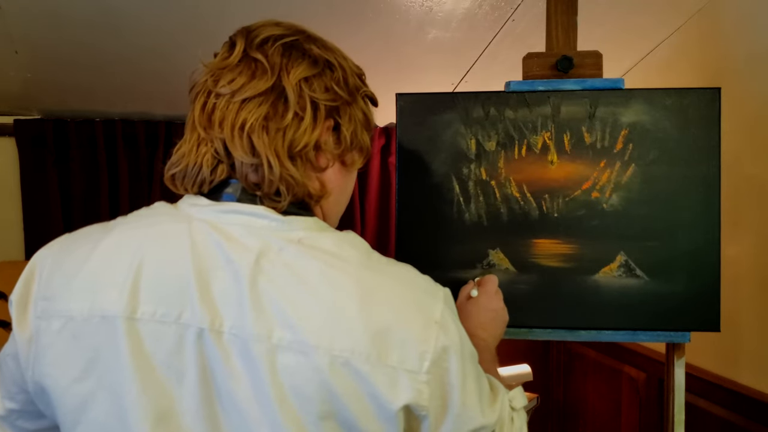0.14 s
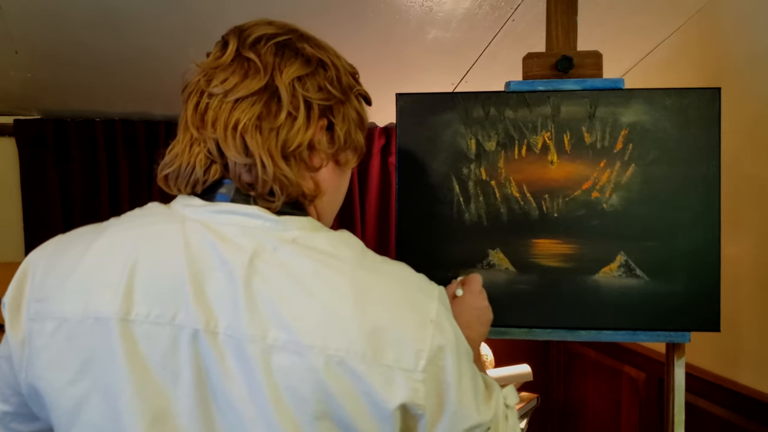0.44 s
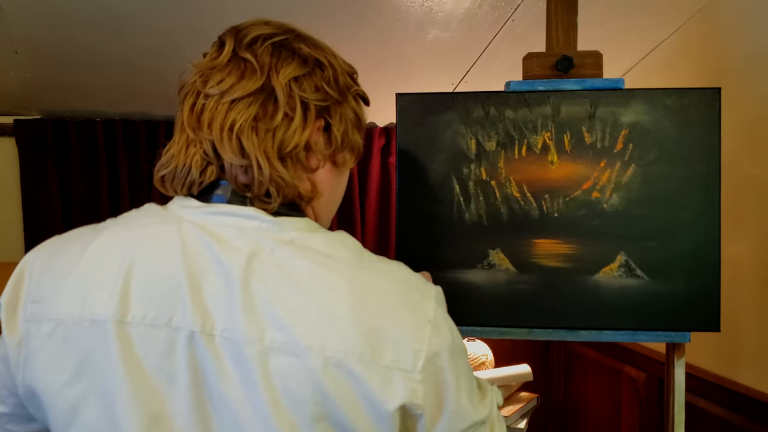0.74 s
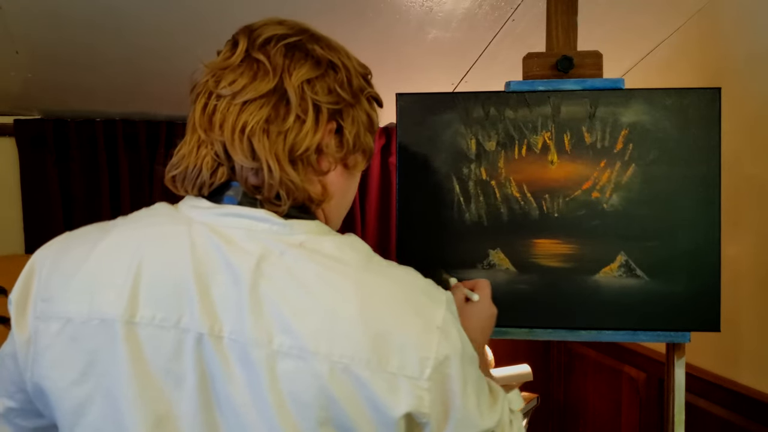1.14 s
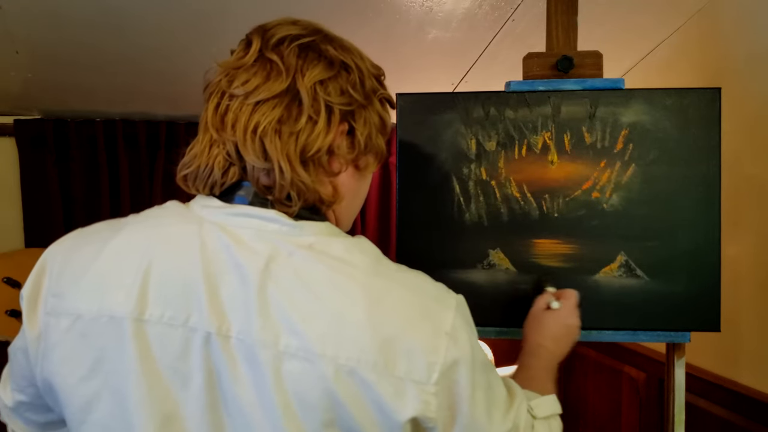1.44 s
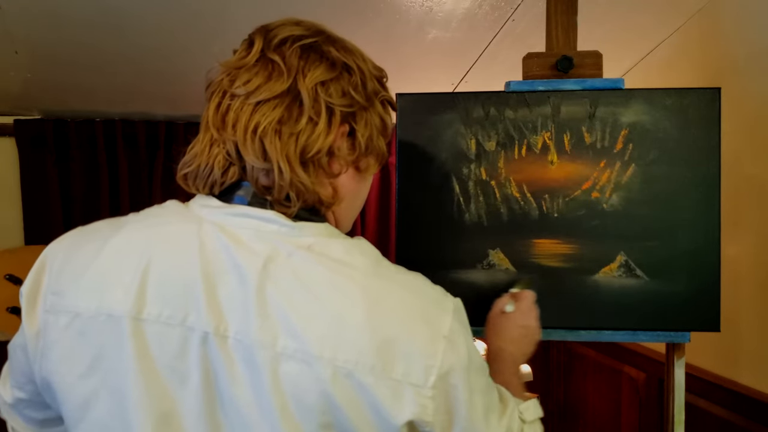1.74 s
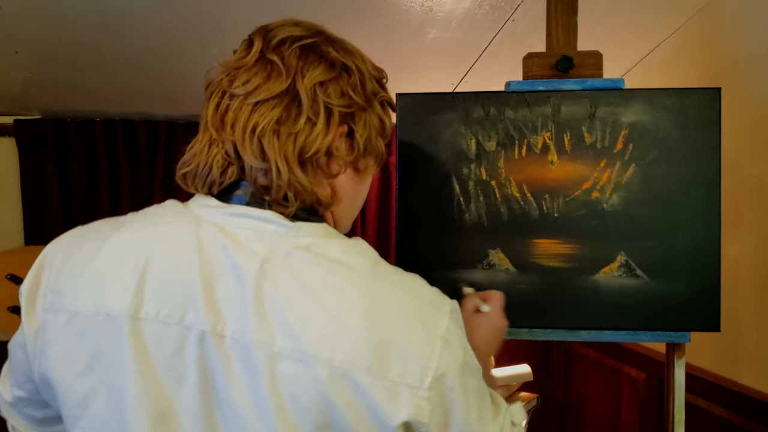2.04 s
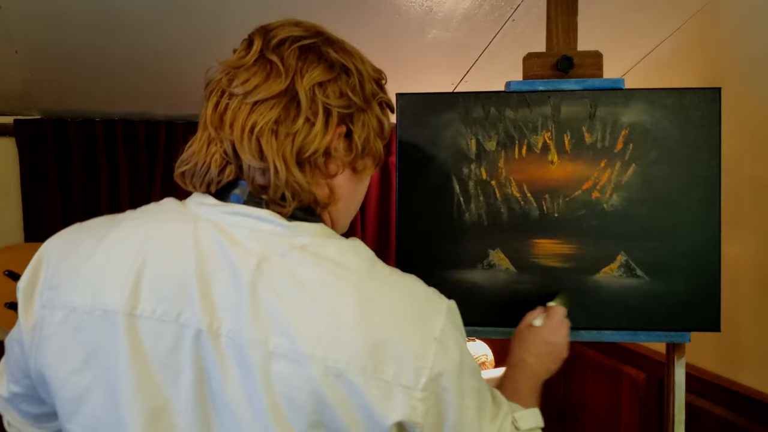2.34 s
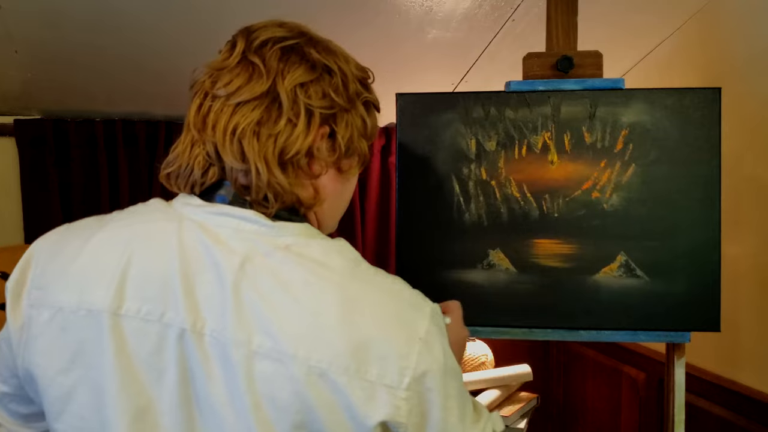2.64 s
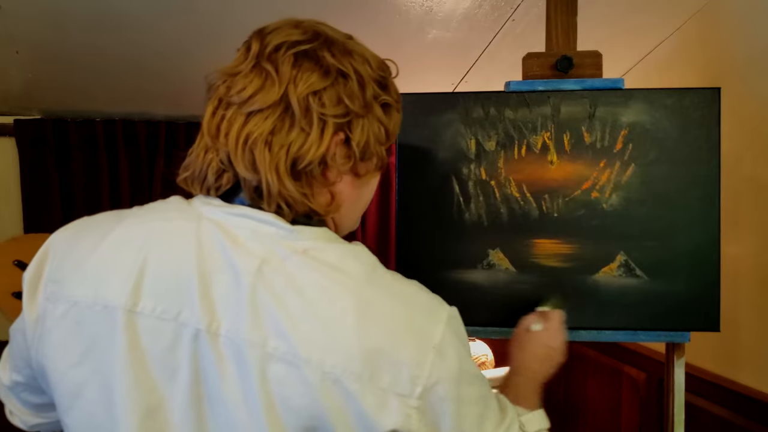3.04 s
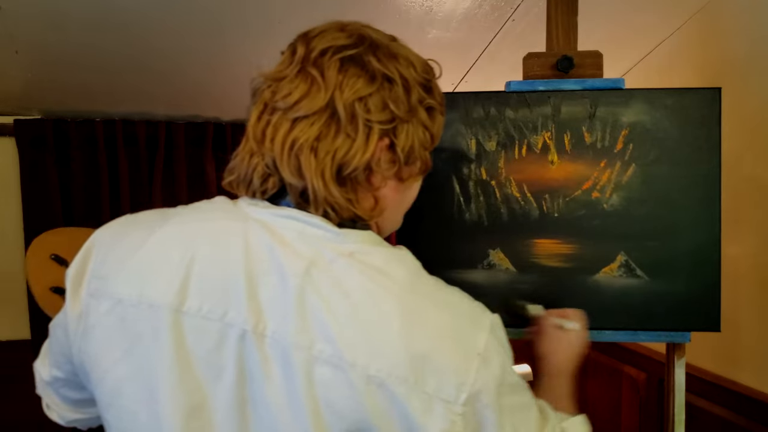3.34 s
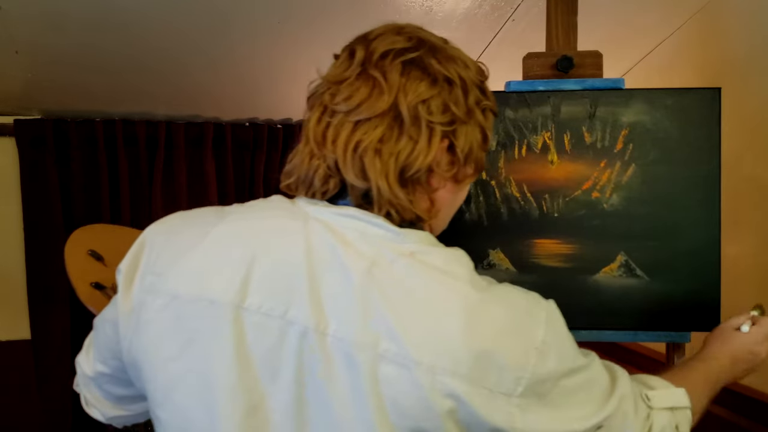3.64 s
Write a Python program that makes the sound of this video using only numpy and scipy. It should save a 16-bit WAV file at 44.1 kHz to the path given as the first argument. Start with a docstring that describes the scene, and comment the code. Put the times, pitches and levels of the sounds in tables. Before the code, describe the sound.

Bristle brush rubbing on stretched canvas, slow at first, then brisk scratchy strokes to and fro

```python
"""A bristle brush scrubs paint over a stretched canvas in a quiet, dry room, above a faint arm rustle.
First comes one long rub: stick-slip noise gives the hiss, threads crossed at hand speed a gliding zip, and
low-pitched noise the soft drumming of the canvas. The bristles flip over with a short rasp as it ends.
After a pause follow seven quick strokes to and fro, each closing with a rasp, three opening with a landing.
At last the brush knocks on the canvas, a damped sine; a short decaying noise tail forms the room."""
import sys
import numpy as np
from scipy import signal
from scipy.fft import rfft, irfft
from scipy.io import wavfile

SR = 44100
rng = np.random.default_rng(int(sys.argv[2]) if len(sys.argv) > 2 else 0)


def dump_mix(stems):
    """Bounce the given channels to the path in sys.argv[1] as a 16-bit WAV at rate SR."""
    frames = np.atleast_2d(stems).T  # one column per channel
    limited = np.clip(frames, -1, 1)  # hard clip at full scale
    pcm = np.round(limited * 32767).astype(np.int16)
    wavfile.write(sys.argv[1], SR, pcm)


N = 167580
T = np.arange(N) / SR  # s

# spectrum of bristles scratching over the weave: f/Hz, spectral level/dB
SCRATCH_SPECTRUM = [(100, -31), (400, -18.5), (560, -5.5), (700, -5), (850, -12.5), (1100, -2), (1350, 2.5),
                    (1700, 2), (1900, 0.5), (2150, -18.5), (5000, -28.5), (15000, -50.5)]


def amp(db):
    """Level is logarithmic: 20 dB are a factor of ten in amplitude."""
    return 10 ** (np.asarray(db) / 20)


def unit(x):
    """Normalisation by the root mean square makes a level set the power."""
    return x / np.sqrt(np.mean(x ** 2) + 1e-20)


def colour(x, points, tilt_db=0):
    """Linear filtering multiplies a spectrum by a source curve, a tilt in dB per octave and resonances."""
    # fixed resonances of canvas and frame: f/Hz, width/Hz, lift/dB
    resonances = [(416, 35, 3), (670, 55, 3), (880, 70, 3), (1186, 40, 4), (1455, 60, 3), (1570, 60, 3),
                  (1700, 40, 4), (2650, 70, 3), (2890, 60, 2), (3116, 65, 3), (3346, 50, 4), (3530, 40, 3),
                  (4306, 60, 3), (4640, 60, 4), (4820, 50, 3), (5436, 80, 3), (7090, 90, 3)]
    hz = np.arange(1, SR / 2, 5)
    point_hz, point_db = np.transpose(points)
    db = np.interp(np.log(hz), np.log(point_hz), point_db)
    db = db + tilt_db * np.log2(np.maximum(hz, 1000) / 3000)  # no further tilt below 1 kHz
    for centre, width, lift_db in resonances:
        db = db + lift_db / (1 + (2 * (hz - centre) / width) ** 2)
    gain = np.interp(np.fft.rfftfreq(N, 1 / SR), hz, amp(db))
    return unit(irfft(rfft(x) * gain, N))


def fuzzy_tone(hz, pole_width_hz):
    """Modulation shifts low-passed complex noise to a fixed or moving pitch: a narrow noise band."""
    r = np.exp(-np.pi * pole_width_hz / SR)
    noise = rng.standard_normal(N) + 1j * rng.standard_normal(N)
    envelope = signal.lfilter([(1 - r) ** 2], [1, -2 * r, r * r], noise)  # two equal poles
    phase = 2 * np.pi * np.cumsum(hz * np.ones(N)) / SR
    return unit((envelope * np.exp(1j * phase)).real)


def bell(time, half):
    """A Gaussian envelope rises and falls smoothly, to exp(-1/2) at the half length."""
    return np.exp(-.5 * ((T - time) / half) ** 2)


def background():
    """Broadband noise: the rustle of the moving arm over a very low, steady room floor."""
    # loudness of the arm: t/s, level/dB
    arm_levels = [(0, -82), (.72, -80), (.8, -97.5), (.96, -99), (1.11, -116), (1.2, -79), (1.5, -77),
                  (1.62, -66.5), (1.69, -85), (1.76, -66), (2.03, -74.5), (2.22, -75), (2.37, -72),
                  (2.72, -66), (3.05, -63), (3.36, -70.5), (3.8, -65.5)]
    # spectrum of the arm rustle: f/Hz, spectral level/dB
    rustle_spectrum = [(20, -20.5), (60, -4.5), (130, -7), (270, -2.5), (380, -7), (1100, -11.5),
                       (2000, -19.5), (4500, -24.5), (15000, -27)]
    # spectrum of the room floor: f/Hz, spectral level/dB
    floor_spectrum = [(20, -3.5), (70, 5), (250, 10.5), (500, -19.5), (1200, -23), (5000, -29),
                      (15000, -29)]
    floor_db = -102
    arm_gain = amp(np.interp(T, *np.transpose(arm_levels)))
    arm = arm_gain * colour(rng.standard_normal(N), rustle_spectrum)
    return arm + amp(floor_db) * colour(rng.standard_normal(N), floor_spectrum)


def bristles():
    """Stick-slip friction: countless tiny slips sum to Gaussian noise, some sharper catches stand out."""
    catches_per_s, catch_spread_db = 7000, 2.5
    catch_share = 0.29  # of the power
    caught = rng.random(N) < catches_per_s / SR
    strength = amp(catch_spread_db * np.minimum(rng.exponential(1, N), 4))
    catches = unit(rng.standard_normal(N) * strength * caught)
    return np.sqrt(catch_share) * catches + np.sqrt(1 - catch_share) * rng.standard_normal(N)


def weave_zip(start, end, top_time, top_hz, slow, zip_db, half_db):
    """Periodic excitation: the thread-crossing rate follows hand speed and sets the pitch and its octaves."""
    zip_width_hz, half_zip_width_hz = 84, 120  # of each filter pole
    double_zip_db = -6.5  # relative to the zip
    fade_s, lead_s = 0.094, 0.028
    hz = top_hz * .5 ** (((T - top_time) / slow) ** 2)
    upper = amp(double_zip_db) * fuzzy_tone(2 * hz, 2 * zip_width_hz)
    zips = amp(zip_db) * (fuzzy_tone(hz, zip_width_hz) + upper)
    zips = zips + amp(half_db) * fuzzy_tone(hz / 2, half_zip_width_hz)
    gliding = np.clip((T - start) / fade_s, 0, 1) ** 2 * np.clip((end - T) / lead_s, 0, 1)
    return gliding * zips


def stroke(motion, weave):
    """Friction grows with pressure, which drives hiss, weave and canvas; the hiss dulls as the hand stops."""
    # hiss of moving bristles: f/Hz, spectral level/dB
    hiss_spectrum = [(100, -34), (400, -14.5), (700, -17), (1100, -4), (1500, -8.5), (1900, -4.5),
                     (2150, -5.5), (2500, -3.5), (3000, -2.5), (4300, 1.5), (5400, 0), (6200, -1.5),
                     (8500, -2.5), (10800, -6.5), (12300, -12.5), (15700, -15)]
    # softer hiss of bristles coming to rest: f/Hz, spectral level/dB
    settle_spectrum = [(100, -40.5), (700, -4.5), (1500, -6.5), (2200, -1.5), (3500, 1), (5500, -3.5),
                       (8500, -16), (15000, -21.5)]
    # response of the canvas body: f/Hz, spectral level/dB
    body_spectrum = [(20, -33), (55, -16), (110, -9.5), (170, -10), (260, -0.5), (345, -6), (430, 0),
                     (520, -0.5), (700, 6), (950, 1), (1400, 0), (2500, -19), (8000, -54)]
    body_follows = 0.78  # dB of body per dB of pressure
    bright_per_db = 0.2247  # tilt in dB per octave, per dB of swell
    dull_s = 0.026
    start, end, level_db, swell_db, arch_db, attack, release, bright_db, body_db = motion
    top_time, top_hz, slow, zip_db, half_db, scratch_db = weave

    progress = np.clip((T - start) / (end - start), 0, 1)
    after = np.maximum(T - end, 0)
    press_db = swell_db * (progress - 1) + arch_db * 4 * progress * (1 - progress)
    contact = np.clip((T - start) / attack, 0, 1) * np.exp(-after / release)
    moving = np.exp(-after / dull_s)

    # the hiss brightens along the stroke when the swell is positive
    slips, shift_db = bristles(), bright_per_db * swell_db
    early = colour(slips, hiss_spectrum, bright_db - shift_db)
    late = colour(slips, hiss_spectrum, bright_db + shift_db)
    hiss = (1 - progress) * early + progress * late
    hiss = moving * hiss + (1 - moving) * colour(slips, settle_spectrum)

    scratch = amp(scratch_db) * moving * colour(bristles(), SCRATCH_SPECTRUM)
    threads = weave_zip(start, end, top_time, top_hz, slow, zip_db, half_db) + scratch
    body = amp(body_db + body_follows * press_db) * colour(bristles(), body_spectrum)
    return amp(level_db) * contact * (amp(press_db) * (hiss + threads) + body)


def strokes():
    """Superposition: the long rub and the seven quick strokes add linearly."""
    # hand motion: start t/s, end t/s, hiss level at the end/dB, swell from start to end/dB,
    # mid-stroke arch/dB, attack/s, release/s, brightness/(dB per octave), body level re stroke level/dB
    motions = [(-.05, 0.662, -45.5, 13, -4.5, .02, 0.018, -3.1, -9.5),
               (1.126, 1.533, -45, 10, 1.5, 0.079, 0.023, -0.75, -11),
               (1.705, 1.93, -43.5, 12.5, 4, 0.043, 0.026, 1.5, -13),
               (2.046, 2.301, -47, 7.5, 7, 0.0071, 0.027, -0.5, -10),
               (2.375, 2.632, -47, 14.5, 10.5, 0.018, 0.032, 1.5, -12.5),
               (2.735, 2.95, -43, 6, 7, .012, 0.028, -2, -13.5),
               (3.024, 3.216, -38.5, 17, 3, 0.023, 0.032, -0.5, -16),
               (3.377, 3.665, -47, 3, 6.5, 0.0092, 0.039, -1.5, -6.5)]
    # threads crossed in each stroke: top speed t/s, thread rate there f/Hz, time to half speed/s,
    # zip level/dB, level of its lower octave/dB, scratch level/dB (all three re stroke level)
    weaves = [(.66, 1458, .5, -19, -17.5, -4.5), (1.55, 1097, .38, -13, -18, -8.5),
              (1.98, 1703, .2, -7, -19.5, -8), (2.27, 1340, 0.28, -10, -21, -8),
              (2.63, 1672, 0.24, -7.5, -18, -10.5), (2.885, 2085, .14, -10, -11.5, -13.5),
              (3.2, 2143, 0.11, -9.5, -18.5, -14.5), (3.53, 1844, .29, -9, -10.5, -15)]
    return sum(stroke(motion, weave) for motion, weave in zip(motions, weaves))


def drums():
    """Forced vibration: cloth and easel answer softly in narrow bands as they are pushed and let go."""
    # drumming between and under strokes: t/s, level/dB, half length/s, f/Hz
    events = [(.2, -70, 0.11, 239.2), (0.512, -68, 0.11, 233.8), (0.735, -73.5, .022, 75),
              (1.615, -73, 0.037, 1102), (1.62, -68, .035, 221), (1.75, -71, 0.031, 120),
              (2.025, -72, 0.013, 101), (2.202, -56, 0.017, 403), (2.705, -57.5, 0.026, 265),
              (2.775, -60, .03, 250), (3.123, -70.5, 0.05, 125), (3.333, -62.5, 0.027, 245),
              (3.47, -62, .015, 160), (3.792, -64, 0.056, 270)]
    pole_width_hz = 83
    return sum(amp(db) * bell(time, half) * fuzzy_tone(hz, pole_width_hz)
               for time, db, half, hz in events)


def flips():
    """Elastic release: bristles flip over as a stroke ends and rasp in a short noise burst."""
    # rasps: t/s, level/dB, half length/s, brightness/(dB per octave)
    events = [(0.655, -38, .012, -0.5), (1.519, -41, 0.0095, -1.5), (1.919, -34, 0.015, -1),
              (2.294, -40, .012, -2.5), (2.623, -30, 0.01, 0), (2.957, -42.5, 0.0058, -0.5),
              (3.212, -27.5, .009, 1.8), (3.669, -39, 0.0097, 3.5)]
    # spectrum of the rasp: f/Hz, spectral level/dB
    rasp_spectrum = [(100, -53.5), (450, -28), (750, -14), (1050, -7.5), (1250, -0.5), (1650, 6.5),
                     (2150, -3.5), (2700, -3.5), (3300, -1), (4500, 1.5), (5500, -6.5), (7200, -6),
                     (10000, -19.5), (15700, -27)]
    point = 1.46  # envelope shape: 1 is pointed, 2 is round
    rasps = np.zeros(N)
    for time, db, half, bright_db in events:
        envelope = np.exp(-.5 * abs((T - time) / half) ** point)
        rasps = rasps + amp(db) * envelope * colour(bristles(), rasp_spectrum, bright_db)
    return rasps


def landings():
    """Impact: the brush meets the cloth with a fast rise and an exponential decay of scratch noise."""
    # landings: t/s, level before rise and decay/dB
    events = [(2.045, -55), (2.737, -52.5), (3.377, -50)]
    rise_s, decay_s, bright_db = .002, 0.024, -1  # brightness in dB per octave
    touch = np.zeros(N)
    for time, db in events:
        rise = np.clip((T - time) / rise_s, 0, 1)
        touch = touch + amp(db) * rise * np.exp(-np.maximum(T - time, 0) / decay_s)
    return touch * colour(bristles(), SCRATCH_SPECTRUM, bright_db)


def brush():
    """Amplitude modulation: a little flutter in the grip on the paint varies all bristle sounds together."""
    flutter_db, flutter_s = 0.91, 0.019  # rms depth, correlation time
    rub = strokes() + flips() + landings()
    pole = np.exp(-1 / (flutter_s * SR))
    flutter = unit(signal.lfilter([1], [1, -pole], rng.standard_normal(N)))
    return rub * amp(flutter_db * flutter)


def knock():
    """Damped free vibration: the brush knocks on the canvas, a sine with exponential decay."""
    start_s, level_db, hz, decay_s = 3.7955, -37, 730, 0.0015
    age = np.maximum(T - start_s, 0)
    return amp(level_db) * np.sin(2 * np.pi * hz * age) * np.exp(-age / decay_s)


def room(x):
    """Reverberation: convolution with exponentially decaying noise, the tail of a small, curtained room."""
    t60_s = 0.15
    t = T[:SR // 3]
    tail = rng.standard_normal(len(t)) * amp(-60 * t / t60_s) * (t > .003)  # starts after 3 ms
    return signal.fftconvolve(x, tail / np.linalg.norm(tail))[:N]


def scene():
    """Superposition of direct sound, its reverberation and the background."""
    room_db = -11.5
    direct = brush() + drums() + knock()
    return (direct + amp(room_db) * room(direct) + background())[None]


def record(dry):
    """Band limitation: convolution with a linear-phase low-pass removes the highest treble."""
    edge_hz = 15720
    low_pass = signal.firwin(1023, edge_hz, window=("kaiser", 9), fs=SR)
    return signal.oaconvolve(dry, low_pass[None], "same")


dry = scene()
out = record(dry)
dump_mix(out)
```